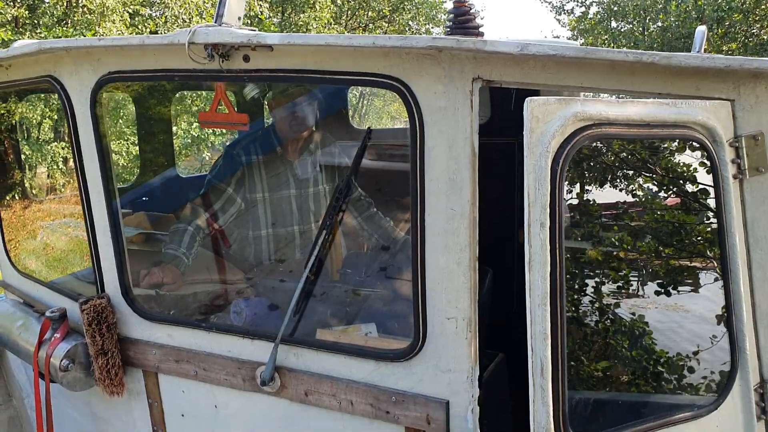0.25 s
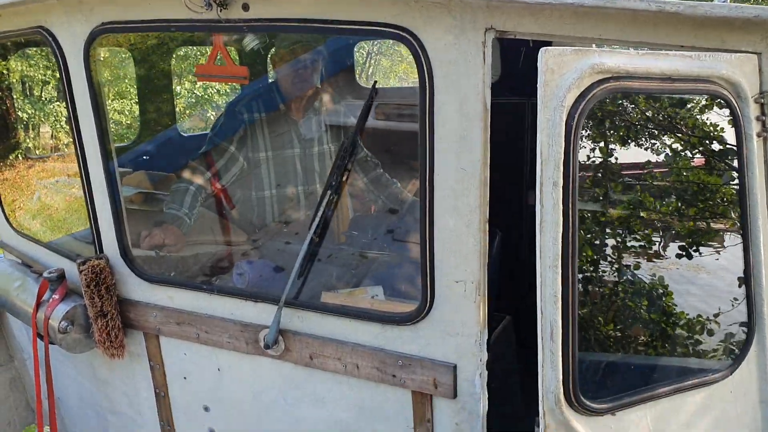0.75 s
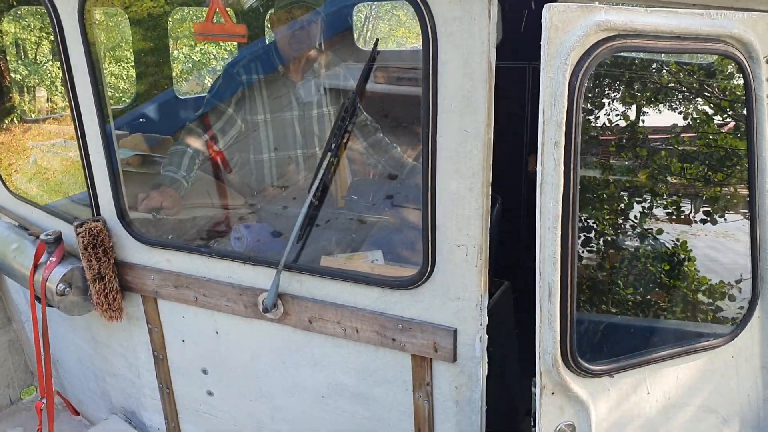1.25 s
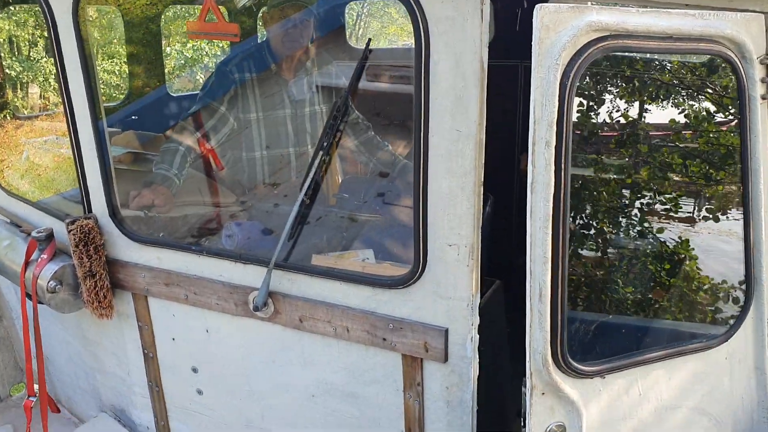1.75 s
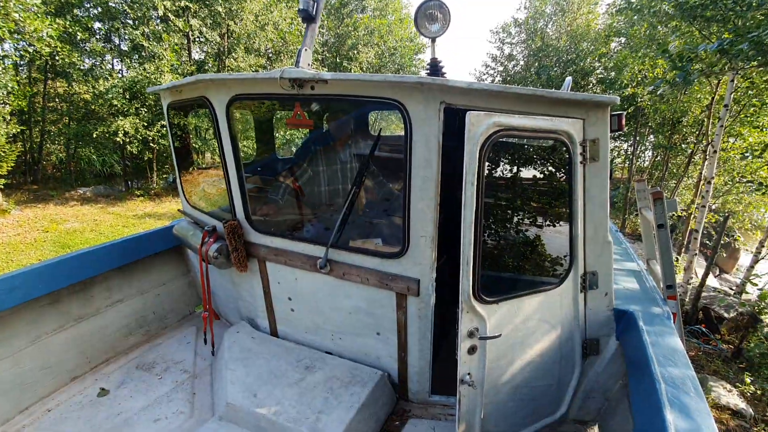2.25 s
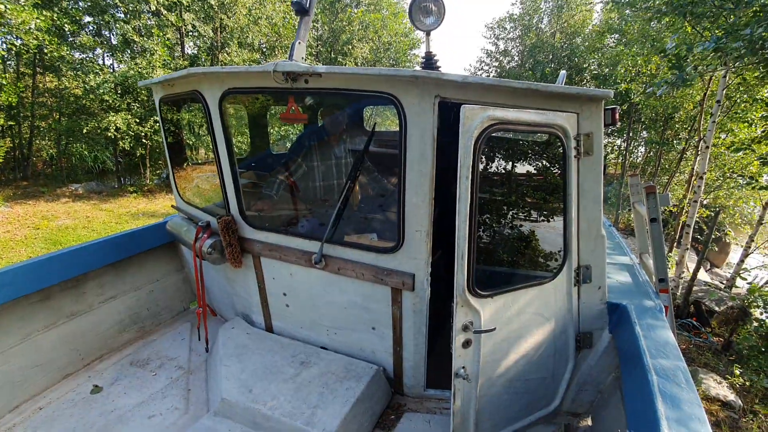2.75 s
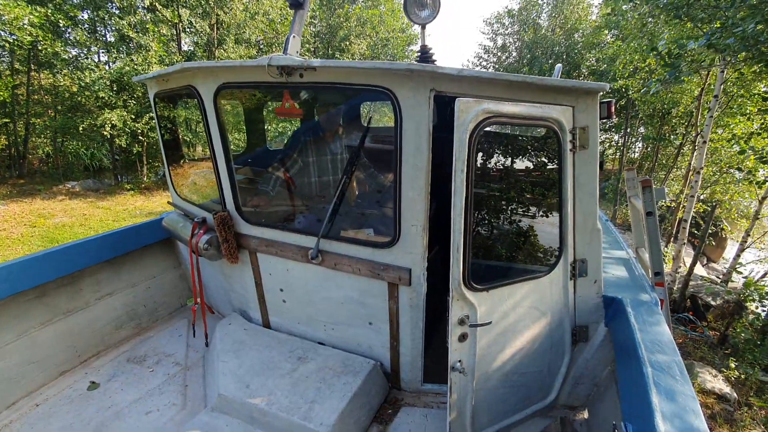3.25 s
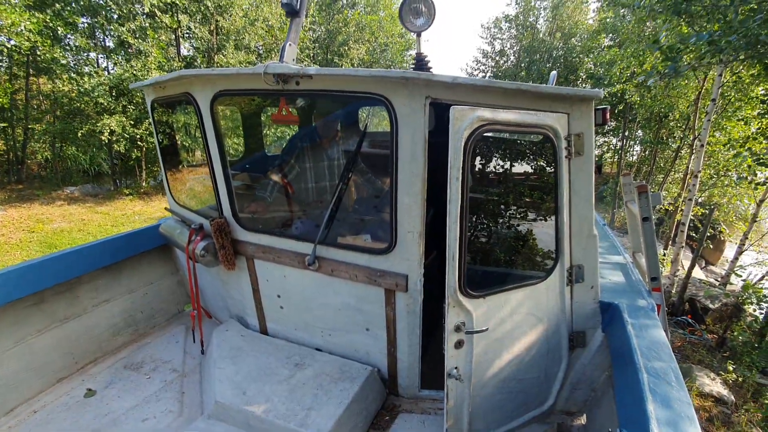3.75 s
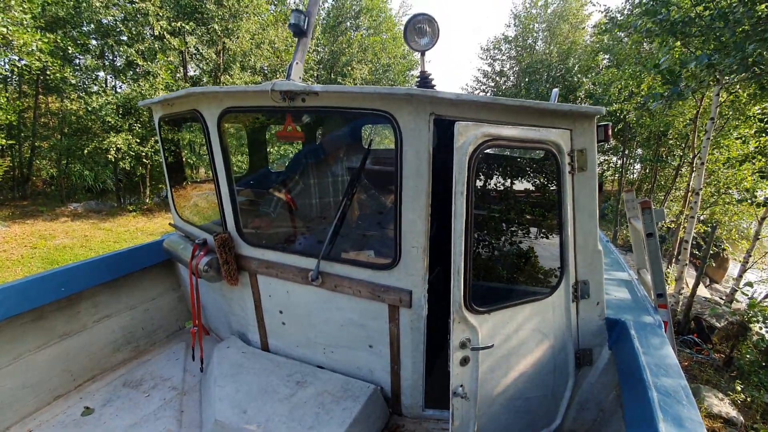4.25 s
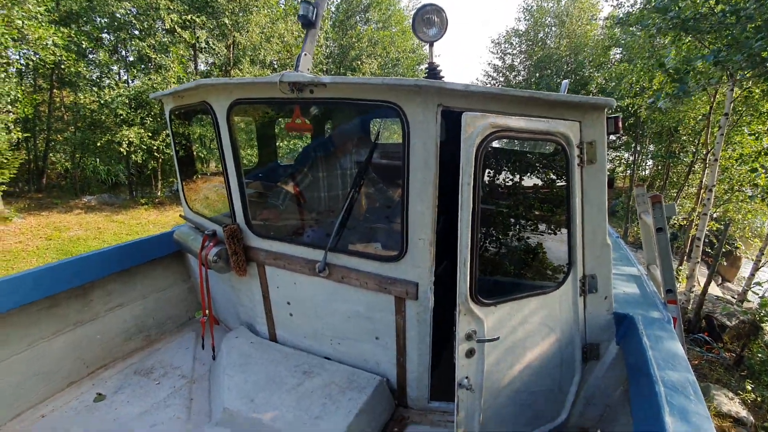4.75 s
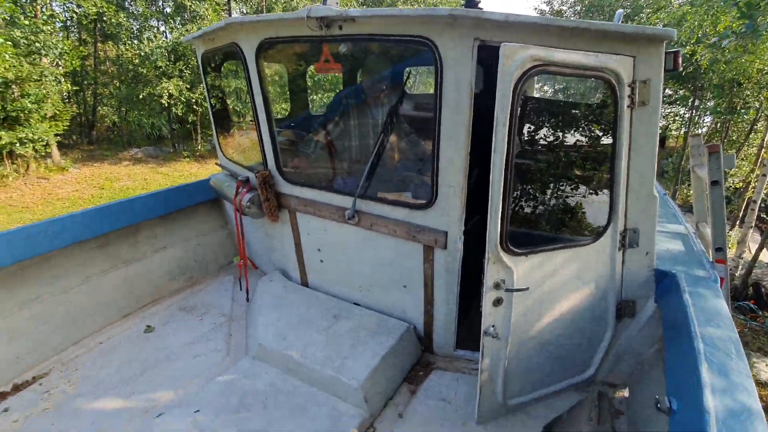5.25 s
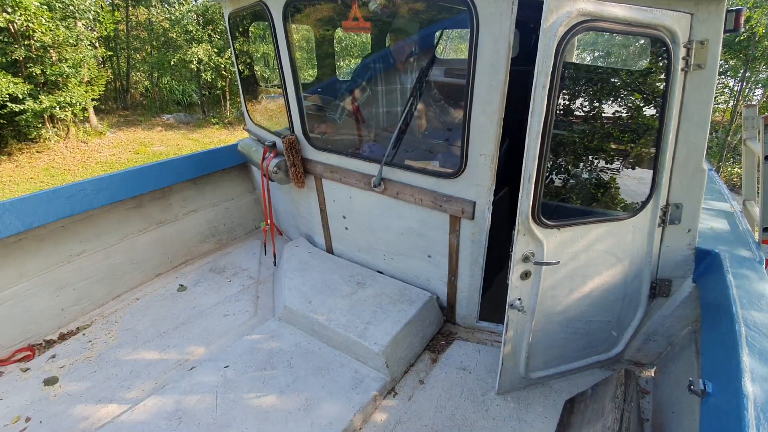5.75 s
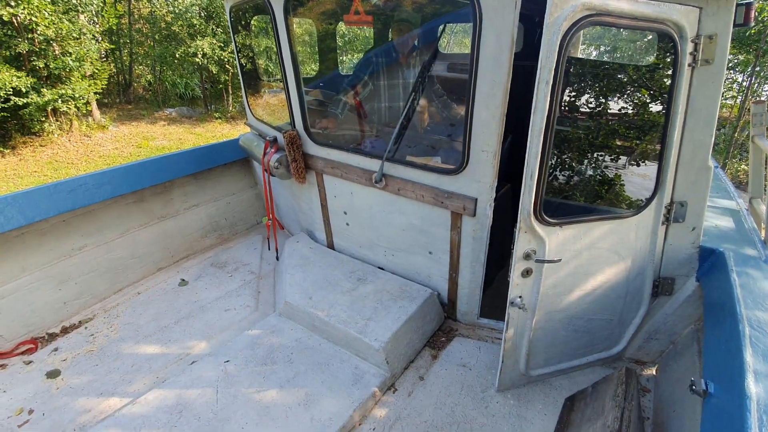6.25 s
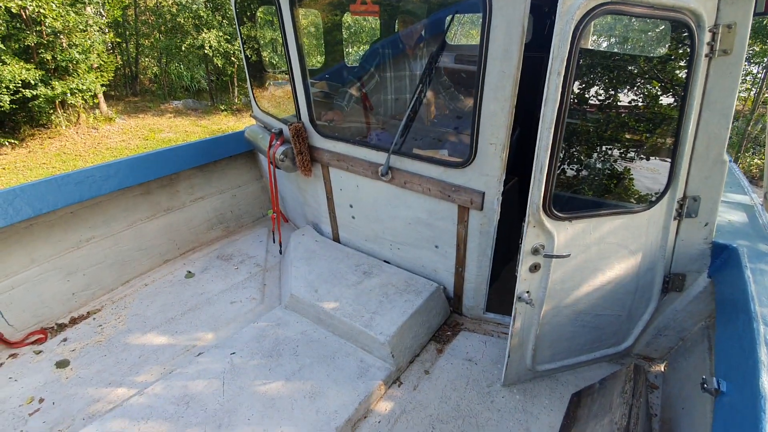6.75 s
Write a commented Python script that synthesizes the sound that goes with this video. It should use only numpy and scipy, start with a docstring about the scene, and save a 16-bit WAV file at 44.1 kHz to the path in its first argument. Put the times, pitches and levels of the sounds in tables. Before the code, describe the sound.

Close by, a boat's idling diesel rumbles and gurgles, surging regularly with a raspy spit, a low thump and a splash.

```python
"""A boat's exhaust burbles and surges about twice a second: a rasping spit, a thump, a splash.
It belongs to a six-cylinder diesel idling in a small boat on land, heard from the deck by the cabin.
The engine's speed sags and recovers with each surge; trapped air hoots in the water-filled muffler.
The engine clatters faintly behind the cabin wall, and a thin whine joins near the end."""
import sys
import numpy as np
from scipy import signal
from scipy.fft import rfft, irfft, next_fast_len
from scipy.io import wavfile
from scipy.ndimage import uniform_filter1d, map_coordinates

SR = 44100
rng = np.random.default_rng(int(sys.argv[2]) if len(sys.argv) > 2 else 0)


def wav_record(signal):
    """Record a signal, one row per channel, as 16-bit PCM in the file named by sys.argv[1]."""
    frames = np.transpose(np.atleast_2d(signal))
    bounded = np.clip(frames, -1, 1)
    # unit amplitude maps onto the largest positive 16-bit level
    quanta = np.round(bounded * 32767).astype(np.int16)
    wavfile.write(sys.argv[1], SR, quanta)


N = 307818
TIME = np.arange(N) / SR

# brief rises and dips of the bass at the start: t/s, level/dB
BASS_LEVEL = [(0, 5), (.11, -1), (.172, 2), (.182, -10), (.22, -2), (.275, 0), (.3, 2.5), (.38, 1.5),
              (.46, 2.5)]
def exhaust(firings, cycles):
    """Gas breaks through the cooling water in uneven gulps, sounding the pipe, muffler and outlet."""
    gulps = blows(firings, count=3, scatter_s=0.04, size_db=0.5)
    bass_gain = amp(curves(BASS_LEVEL)[0]) * lull(depth_db=2, lag_s=0.015, span_s=0.025)
    bass = bass_gain * (thumps(gulps) + drone(cycles)) + thuds(cycles)
    muffler = np.sqrt(np.minimum(bass_gain, 1)) * gurgle(gulps, firings) + hoots()
    return bass + muffler + dip_before_bark(depth_db=3, span_s=0.019) * spit(gulps, firings)


# each surge: t/s, length/ratio, then the boost/dB of thump, churn, spit and spray
SURGES = [(0.357, 1.26, 4.5, 3.5, 8.5, 3), (1.034, 1.3, 1.5, 5.5, 9, 6), (1.514, 1.75, 1.5, 1.7, 5.5, 1.5),
          (1.996, 1.32, 3.5, 3.5, 6, 2.4), (2.465, 1.26, 1, 4.5, 8.5, 4), (2.935, 0.78, 1, 4, 6, 3),
          (3.397, 1.44, 5, 4, 7, 4), (3.892, 1.34, 3, 2, 3.5, 1), (4.342, 1.02, 2, 3, 8, 5),
          (4.815, 1.23, 3, 4.5, 7.5, 3.5), (5.271, 1.1, 4.5, 5.6, 8.3, 4.5), (5.784, 1.7, 2.5, 3.5, 6, 1.4),
          (6.224, 1.3, 1, 5, 10, 3.5), (6.718, 1.27, 2.5, 3.5, 7.3, 3.5)]
# gas flow through the outlet, weaker at first: t/s, level/dB
GAS_FLOW = [(0, -3), (.165, -7), (.19, -8.5), (.245, -9.5), (.31, -7), (.65, -1.5), (1, 0), (2, 1), (7, 0)]
def surge(part, idle_db, lag_s, rise_s, fall_s, steep, dip_db, after_db, drift_db_per_s, flow_share):
    """One part's level in dB: it dips before each surge, swells, then shifts briefly after it."""
    dip_lead_s, dip_s = 0.13, 0.068
    after_lag_s, after_s = 0.22, 0.084
    t = np.linspace(0, N / SR, 2000)
    db = idle_db + drift_db_per_s * t + flow_share * np.interp(t, *np.transpose(GAS_FLOW))
    for s, length, *boosts in SURGES:
        boost_db = boosts[("thump", "churn", "spit", "spray").index(part)]
        db += boost_db * swell(t - s - lag_s, rise_s * length, fall_s * length, steep)
        db -= dip_db * swell(t - s + dip_lead_s, dip_s, dip_s)
        db += after_db * swell(t - s - after_lag_s, after_s, after_s)
    return np.interp(TIME, t, db)


# tone colours of the weak and the strong gas jet: f/Hz, level/dB
SPLUTTER_COLOUR = [(300, -31.5), (520, 3.5), (640, 1.5), (780, 3), (930, 4.5), (1000, 3.5), (1040, -7.5),
                   (1087, 2.5), (1130, -6), (1290, -4.5), (1400, -5.5), (1540, -12.5), (2300, -18),
                   (9000, -101)]
RASP_COLOUR = [(700, -25), (950, 3.5), (1100, 2), (1290, -1), (1400, -12), (1560, -14.5), (2300, -27),
               (4500, -46), (9000, -99)]
def spit(gulps, firings):
    """A weak jet of gas only splutters; a strong one turns raspy and beats with the firings."""
    jet_db = surge("spit", idle_db=-40, lag_s=0.019, rise_s=0.098, fall_s=0.052, steep=3.4,
                   dip_db=1.5, after_db=3, drift_db_per_s=-0.3143, flow_share=0.58)
    weak_jet = patchy(puffs(gulps, life_s=0.012, steady=1), depth_db=2)
    splutter = even(heard(weak_jet, colour(SPLUTTER_COLOUR)), span_s=0.056)
    beats = blows(firings, count=2, scatter_s=0.012, size_db=2.5)
    strong_jet = patchy(puffs(beats, life_s=0.0065, steady=1), depth_db=3)
    rasp = even(heard(strong_jet, colour(RASP_COLOUR)), span_s=0.075)
    rasp_share = np.clip(amp(0.77 * (jet_db - jet_db.max()) - 2.5), 0, 1)
    jet = np.sqrt(1 - rasp_share ** 2) * splutter + rasp_share * rasp
    return amp(jet_db - 2.46 * rasp_share + 0.91 * wobble(16)) * jet


# low ringing notes of the exhaust pipe and hull: f/Hz, width/Hz, level/dB
PIPE_NOTES = [(56.5, 15, -0.5), (79.2, 12, -1.5), (103.3, 21.4, -2.5)]
def thumps(gulps):
    """Gulps of gas make the whole exhaust pipe ring."""
    push_db = surge("thump", idle_db=-27.5, lag_s=0.056, rise_s=0.054, fall_s=0.06, steep=2.1,
                    dip_db=1, after_db=-0.5, drift_db_per_s=0.45, flow_share=0.82)
    ring = heard(bursts(gulps), body(PIPE_NOTES, low_hz=39.5, high_hz=128))
    return amp(push_db + 0.87 * wobble(17)) * even(ring, span_s=0.048)


# the thud ending each surge: t/s, half length/s, then level/dB at 2, 3, 4 and 6 times the firing rate
DEEP_THUDS = [(0.405, .06, -29, -24, -42, -32), (1.106, 0.025, -15, -17.5, -26, -22),
              (1.607, .07, -20.5, -27, -32, -49), (2.054, 0.092, -25, -28.5, -30, -28.5),
              (2.529, .035, -23, -17, -32, -33), (3.004, 0.045, -19, -23, -22.5, -34),
              (3.462, 0.045, -21, -22, -26, -26), (3.98, 0.11, -21.5, -23.5, -33, -32.5),
              (4.416, 0.049, -19, -23.5, -25.5, -25.5), (4.884, 0.092, -24, -31, -25, -27),
              (5.342, .032, -25, -17.5, -17, -24), (5.865, 0.092, -24, -18.5, -30, -35),
              (6.305, 0.056, -16.5, -19.5, -27, -28.5), (6.809, 0.11, -20.5, -27, -26, -41)]
def thuds(cycles):
    """A few heavy firings pass through the pipe; their low notes swell quickly and die away."""
    phase = 2 * np.pi * cycles + 0.099 * wobble(18)
    notes = np.sqrt(2) * np.cos(np.outer((2, 3, 4, 6), phase) + 2 * np.pi * rng.random((4, 1)))
    return sum(swell(TIME - s, 0.87 * length, length, steep=3) * (amp(levels_db) @ notes)
               for s, length, *levels_db in DEEP_THUDS)


def lull(depth_db, lag_s, span_s):
    """The burble's volume sinks briefly after each thud."""
    dips = sum(swell(TIME - s - length - lag_s, span_s, span_s) for s, length, *_ in DEEP_THUDS)
    return amp(-depth_db * dips)


# ringing notes of the muffler: f/Hz, width/Hz, level/dB
MUFFLER_NOTES = [(156.8, 18, 1), (175, 19, -3.5), (197, 66, -6), (222.9, 13.4, 3), (258, 22, -2),
                 (273, 11, -6), (310.7, 16.8, -0.5), (354.8, 18.6, -3.5), (396.5, 34, -7.5),
                 (417, 115, -9.5), (564, 88, -24)]
def gurgle(gulps, firings):
    """Gulps and many smaller bubbles make the water-filled muffler ring."""
    churn_db = surge("churn", idle_db=-26.5, lag_s=0.044, rise_s=0.14, fall_s=0.048, steep=2.8,
                     dip_db=2.5, after_db=-0.5, drift_db_per_s=0, flow_share=0.67)
    bubbles = gulps + blows(firings, count=8, scatter_s=0.06, size_db=0.5)
    gain = amp(churn_db + 0.21 * wobble(12))
    ring = heard(bursts(bubbles), body(MUFFLER_NOTES, low_hz=139, high_hz=672))
    return gain * even(ring, span_s=0.055)


# air pockets in the muffler: t/s, half length/s, f/Hz, level/dB
AIR_POCKETS = [(1.828, 0.13, 230.6, -30.5), (2.221, 0.12, 242.8, -28), (2.448, 0.029, 223, -24.5),
               (2.487, .035, 352.7, -25.5), (2.652, 0.091, 258, -32), (2.92, 0.044, 227.3, -22),
               (2.976, 0.047, 315, -28), (3.39, 0.034, 223.6, -23), (3.445, .025, 365, -28.5),
               (3.649, 0.13, 239.5, -27.5), (4.041, 0.091, 246.6, -30), (4.45, 0.04, 277, -24.5),
               (4.604, 0.036, 254, -31.5), (4.84, 0.11, 248, -28), (5.191, 0.04, 222.4, -23),
               (5.479, 0.15, 252, -28.5), (5.96, 0.079, 273, -32.5), (6.15, 0.097, 211, -26),
               (6.582, 0.059, 240.5, -26.5)]
def hoots(sink_hz_per_s=135, roughness=0.22):
    """Trapped air rings; as the water drains, the pocket grows and its hollow note sinks."""
    notes = np.zeros(N)
    for s, length, hz, db in AIR_POCKETS:
        age = TIME - s
        phase = 2 * np.pi * (hz * age - sink_hz_per_s * age ** 2 / 2 + rng.random())
        notes += amp(db) * swell(age, length, length) * np.sqrt(2) * np.sin(phase)
    return notes * unit(1 + roughness * wobble(62))


# the hull's hum between surges: t/s, level/dB
HULL_HUM = [(0, -34), (1, -41), (2, -34), (2.8, -37), (3.7, -36), (4.2, -26.5), (4.7, -34), (5.5, -33.5),
            (6.5, -30), (7, -28)]
def drone(cycles):
    """The hull hums at two and three times the firing rate, where its lowest notes lie."""
    phase = 2 * np.pi * cycles + 0.3 * wobble(6.3)
    hum = unit(np.sin(2 * phase) + amp(-2.5) * np.sin(3 * phase))
    return amp(curves(HULL_HUM)[0] + 1.5 * wobble(9)) * hum


# sharp cracks from the exhaust: t/s, level/dB
CRACK_HITS = [(0.398, -39), (0.936, -36.5), (1.058, -40), (1.49, -47), (2.41, -41), (2.876, -41),
              (3.325, -47.5), (4.288, -41.5), (5.236, -43), (6.14, -47), (6.645, -49)]
# their tone colour: f/Hz, level/dB
CRACK_COLOUR = [(600, -34), (1200, 11), (2500, 5), (3300, -9), (5200, -5), (7200, -24), (8700, -16),
                (10000, -24), (14000, -50)]
def cracks():
    """A short, bright burst of noise cracks out near the start of most surges."""
    return struck(CRACK_HITS, attack_s=0.0032, life_s=0.032) * heard(noise(), colour(CRACK_COLOUR))


# firings that stand out: t/s, relative level/dB
BARK_HITS = [(0.301, -35.5), (0.337, -34), (0.381, -33), (0.939, -32), (0.985, -27), (1.02, -28),
             (1.059, -28.5), (1.479, -37), (2.01, -40), (2.412, -31.5), (2.442, -31), (2.875, -31),
             (2.912, -34), (2.952, -33.5), (3.354, -31.5), (3.389, -28.5), (3.847, -34), (4.292, -30),
             (4.331, -33), (4.761, -36), (5.187, -37), (5.237, -30), (5.271, -33), (6.184, -33),
             (6.22, -42), (6.299, -41), (6.647, -39)]
# their tone colour: f/Hz, level/dB
BARK_COLOUR = [(500, -23), (780, -9.5), (950, 4.5), (1100, -0.5), (1290, -2), (1450, -24), (2400, -19.5),
               (4500, -36.5), (9000, -82)]
def barks():
    """Single firings bark through the pipe."""
    gas = even(heard(noise(), colour(BARK_COLOUR)), span_s=0.004)
    return amp(3.5) * struck(BARK_HITS, attack_s=0.0008, life_s=0.011) * gas


def dip_before_bark(depth_db, span_s):
    """The jet's volume dips for a moment just before each bark."""
    t = TIME[:SR // 20]
    marks = np.zeros(N)
    marks[[int(s * SR) for s, _ in BARK_HITS]] = 1
    dips = signal.fftconvolve(marks, swell(t, span_s, span_s)[::-1])[len(t) - 1:]
    return amp(-depth_db * dips)


# tone colours of flying and landing spray: f/Hz, level/dB
SPRAY_COLOUR = [(700, -48.5), (1400, -2.5), (1700, -2), (2250, 0), (3000, -5.5), (3900, -6.5), (5000, -15),
                (7000, -22.5), (11000, -38), (14000, -81)]
SPLASH_COLOUR = [(4000, -29), (7600, -18.5), (8700, -9), (9700, -8), (10050, -4), (10700, -9), (11500, -9),
                 (12200, -16), (13500, -34), (15500, -50)]
def water(firings):
    """Puffs tear the cooling water into spray, which lands a moment later as a soft fizz."""
    spray_db = surge("spray", idle_db=-46.5, lag_s=-0.0045, rise_s=0.065, fall_s=0.2, steep=1.1,
                     dip_db=1.5, after_db=-0.3, drift_db_per_s=-0.3946, flow_share=0.67)
    splash_db = surge("spray", idle_db=-60, lag_s=0.056, rise_s=0.067, fall_s=0.16, steep=2,
                      dip_db=2.5, after_db=0.5, drift_db_per_s=-0.58, flow_share=0.56)
    jets = puffs(blows(firings, count=2, scatter_s=0.04, size_db=2), life_s=0.021, steady=1.24)
    jets = deck_echoes(patchy(jets, depth_db=3), echo_db=-14)
    spray = even(heard(jets, colour(SPRAY_COLOUR)), span_s=0.066)
    drops = deck_echoes(patchy(noise(), depth_db=3), echo_db=-17)
    fizz = heard(drops, colour(SPLASH_COLOUR))
    return amp(spray_db + 0.33 * wobble(18)) * spray + amp(splash_db) * fizz


# drops that spatter during a surge: t/s, length/s, level/dB
DROP_CLUMPS = [(0.402, 0.16, -48.5), (1.056, 0.041, -46), (3.407, .05, -51), (3.87, 0.07, -47.5),
               (4.8, .05, -54), (5.745, .04, -51)]
# their tone colour: f/Hz, level/dB
DROP_COLOUR = [(900, -30), (2000, 5), (3400, 7), (4500, -6), (6000, -10), (7000, -16), (10000, -29),
               (15000, -45)]
def spatters():
    """A clump of drops bursts out at once and thins away."""
    strength = sum(amp(db) * swell(TIME - s, 0.012, length) for s, length, db in DROP_CLUMPS)
    drops = noise() * amp(2.7 * wobble(300))
    return strength * heard(drops, colour(DROP_COLOUR))


def stirred_air():
    """The outflow of each surge stirs the air, mostly too low to hear."""
    stir_db = surge("spit", idle_db=-51, lag_s=0.03, rise_s=0.11, fall_s=0.08, steep=2.1,
                    dip_db=4, after_db=-3, drift_db_per_s=1.2, flow_share=0.7)
    return amp(stir_db) * heard(noise(), colour([(10, -3), (27, 5), (45, -12), (120, -59), (400, -120)]))


# puffs of hiss: t/s, fade/s, pitch lift/Hz, level/dB
HISS_PUFFS = [(0.44, .14, 950, -63), (1.09, .13, 700, -55.5), (1.66, .12, 400, -64), (2.1, .15, 250, -59),
              (2.53, .09, 700, -59.5), (2.99, .08, 500, -60), (3.47, .13, 900, -61.5),
              (3.91, .14, 650, -62), (4.42, .1, 550, -66), (4.92, .07, 1000, -65), (5.34, .11, 700, -62),
              (5.84, .12, 500, -70), (6.29, .12, 700, -64), (6.77, .11, 550, -63)]
def trailing_hiss(rise_s=0.035, base_hz=10040, width_hz=1200, whistle_db=-3):
    """A thin, high hiss trails each surge; its pitch lifts and falls back over a steady whistle."""
    strength, lift = np.zeros((2, N))
    for s, fall_s, lift_hz, db in HISS_PUFFS:
        shape = swell(TIME - s, rise_s, fall_s)
        strength += amp(db) * shape
        lift += lift_hz * shape
    glide = unit((noise_band(width_hz) * np.exp(2j * np.pi * np.cumsum(base_hz + lift) / SR)).real)
    whistle = unit((noise_band(220) * np.exp(2j * np.pi * base_hz * TIME)).real)
    return strength * (glide + amp(whistle_db) * whistle)


# loose metal fittings: t/s, half length/s, f/Hz, level/dB
LOOSE_FITTINGS = [(0.457, 0.054, 3300, -50), (0.70, 0.014, 2600, -50), (0.858, 0.013, 3560, -51.5),
                  (1.075, .018, 6850, -55), (1.135, 0.055, 3300, -48), (1.393, .012, 3200, -50),
                  (1.538, 0.028, 2900, -49), (2.52, .05, 3140, -55), (3.46, 0.049, 3110, -50),
                  (3.866, 0.027, 3970, -51), (5.347, 0.05, 3310, -51), (5.755, 0.027, 4800, -55)]
def rattles(width_hz=770, chatter_db=8.5):
    """Each shaken fitting buzzes briefly on one metallic note."""
    grain = noise_band(width_hz) * amp(chatter_db * wobble(140))
    notes = sum(amp(db) * swell(TIME - s, length, length) * np.exp(2j * np.pi * hz * TIME)
                for s, length, hz, db in LOOSE_FITTINGS)
    return (grain * notes).real / np.sqrt(np.mean(grain.real ** 2))


# clatter coming through the cabin wall: t/s, relative level/dB
CLATTER_LEVEL = [(0, -58), (.25, -59.5), (.7, -57), (1.1, -54), (2.2, -55), (3.5, -56.5), (5, -59),
                 (5.8, -56.5), (6.5, -58.5), (7, -57.5)]
# its tone colour: f/Hz, level/dB
CLATTER_COLOUR = [(800, 3.5), (2200, 2.5), (4200, 5), (6000, 0.5), (7500, -5.5), (8900, 1.5), (10000, -4),
                  (12500, -5), (14400, -9), (15800, -13)]
# ringing notes of the steel valves and injectors: f/Hz, width/Hz, level/dB
STEEL_NOTES = [(5920, 78, 8.5), (5720, 70, 10), (6800, 90, -9), (8850, 80, -1), (9550, 45, 4),
               (10253, 60, -1)]
def clatter(firings):
    """Fuel injectors and valves tick softly at every firing."""
    strokes = blows(firings, count=2, scatter_s=0.02, size_db=2)
    ticks = patchy(puffs(strokes, life_s=0.011, steady=2.4), depth_db=2.5)
    ticks = deck_echoes(ticks, echo_db=-8.5)
    ring = amp(-10) * heard(ticks, body(STEEL_NOTES, low_hz=4540, high_hz=11000))
    return amp(curves(CLATTER_LEVEL)[0] + 1.5) * (heard(ticks, colour(CLATTER_COLOUR)) + ring)


# a thin whine and a very high whistle: t/s, f/Hz, level/dB
BELT_WHINE = [(0, 1233, -86), (5.2, 1373, -66), (5.8, 1345, -57), (6.15, 1310, -61), (6.35, 1394, -56),
              (7, 1420, -56)]
BELT_WHISTLE = [(0, 10100, -88), (2.5, 10000, -74), (5.6, 10100, -81), (5.75, 9950, -74),
                (5.97, 9945, -72.5), (6.04, 9950, -82), (7, 9800, -77)]
def whines():
    """Parts driven by the engine's belt sing faintly."""
    return tone(BELT_WHINE, waver=0.0054, flutter_db=2) + tone(BELT_WHISTLE, waver=0.00153, flutter_db=5)


# tone colour of the microphone's hiss: f/Hz, level/dB
HISS_COLOUR = [(9000, -30), (11000, -6), (12500, -2), (14400, 0), (15800, -3.5)]
def microphone_hiss():
    """The microphone adds a faint, even hiss at the very top."""
    return amp(-66) * heard(noise(), colour(HISS_COLOUR))


def deck_echoes(pair, echo_db, count=10):
    """The deck, the boat's sides and the cabin wall add quick echoes that ripple the tone colour."""
    delays_s = rng.uniform(0.0022, 0.022, count)
    echoes = sum(np.roll(pair, int(s * SR), -1) * rng.choice([-1, 1]) for s in delays_s)
    return pair + amp(echo_db) * echoes / np.sqrt(count)


# extra left-right difference in the bass: t/s, boost/dB
BASS_WIDTH = [(0, 15.5), (.4, 8.5), (.8, 10), (1.1, 4.5), (1.3, 5.5), (1.6, 3), (2.5, 3), (3.2, 1), (7, 0)]
def widened(pair):
    """Close to the shaking cabin wall, low notes differ more from ear to ear."""
    side = (pair[0] - pair[1]) / 2
    low_side = filtered(side, lambda hz: amp(along([(250, 0.5), (1200, -22), (3000, -80)], hz)))
    return pair + np.outer([1, -1], (amp(curves(BASS_WIDTH)[0]) - 1) * low_side)


# how alike the two ears' sound is: f/Hz, likeness (1 = the same)
EAR_LIKENESS = [(50, 0.99), (125, 0.98), (230, 0.97), (420, 0.92), (520, 0.8), (620, 0.46), (800, 0.69),
                (1050, 0.84), (1450, -0.19), (1750, -0.096), (2500, 0.31), (3600, -0.15), (5500, 0.11),
                (9000, -0.073)]
def heard(pair, response):
    """Filter a direct and a scattered sound, then spread them over left and right at strength 1."""
    def spread(hz):
        angle = np.arccos(np.clip(along(EAR_LIKENESS, hz), -1, 1)) / 2
        return response(hz) * np.array([np.cos(angle), np.sin(angle)])
    mid, side = filtered(pair, spread)
    return unit(np.array([mid + side, mid - side]))


def blows(firings, count, scatter_s, size_db):
    """Each firing breaks into several blows, late by chance and of uneven size."""
    late, size = rng.standard_normal((2, len(firings), count))
    at = (firings[:, None] + np.abs(late) * scatter_s * SR).astype(int) % N
    return np.bincount(at.ravel(), amp(size_db * size).ravel(), N)


def puffs(hits, life_s, steady):
    """Rushing noise that flares at each blow and dies away, over a steady share."""
    flare = unit(signal.lfilter([1], [1, -np.exp(-1 / (life_s * SR))], hits))
    return (flare + steady) * noise()


def bursts(hits):
    """Jolts of pressure arrive directly and also scatter off the hull."""
    scatter = unit(puffs(hits, life_s=0.03, steady=1))
    direct = unit(hits - hits.mean())
    return np.array([unit(direct + amp(-1) * scatter[0]), scatter[1]])


def patchy(pair, depth_db):
    """Make narrow bands of pitch flicker at random, each for a few hundredths of a second."""
    spectrum = signal.stft(pair, nperseg=1024)[2]
    flicker = rng.standard_normal(spectrum.shape[1:])
    for axis in (0, 1, 0, 1):
        flicker = uniform_filter1d(flicker, size=3, axis=axis)
    return signal.istft(spectrum * amp(depth_db * unit(flicker)), nperseg=1024)[1][:, :N]


def tone(rows, waver, flutter_db):
    """A thin note of unsteady pitch and strength."""
    hz, db = curves(rows)
    phase = 2 * np.pi * np.cumsum(hz * (1 + waver * wobble(38))) / SR
    return amp(db + flutter_db * wobble(15)) * unit(np.sin(phase))


def struck(rows, attack_s, life_s):
    """A sudden rise and a quick fade for each (t/s, level/dB) row."""
    t = TIME[:SR // 4]
    hits = np.zeros(N)
    for s, db in rows:
        hits[int(s * SR)] += amp(db)
    return signal.fftconvolve(hits, (1 - np.exp(-t / attack_s)) * np.exp(-t / life_s))[:N]


def swell(age, rise_s, fall_s, steep=2):
    """A rounded bump that reaches 1 at age zero; a steep one rises suddenly to a flat top."""
    return np.exp(-np.where(age < 0, np.abs(age / rise_s) ** steep, (age / fall_s) ** 2))


def noise():
    """Two channels of white noise."""
    return rng.standard_normal((2, N))


def wobble(rate_hz):
    """A smooth random curve through rate_hz points a second."""
    points = rng.standard_normal(int(N * rate_hz / SR) + 4)
    return map_coordinates(points, [TIME * rate_hz])


def noise_band(width_hz):
    """Random wobbles for each ear that blur a pure note into a band of noise."""
    return np.array([wobble(width_hz) + 1j * wobble(width_hz) for ear in range(2)])


def body(notes, low_hz, high_hz):
    """The filter of an object that rings at these notes, falling steeply outside low to high."""
    def response(f):
        power = sum(amp(db) ** 2 * (f * width) ** 2 / ((hz * hz - f * f) ** 2 + (f * width) ** 2)
                    for hz, width, db in notes)
        edges = (1 + (low_hz / (f + 1)) ** 8) * (1 + (f / high_hz) ** 8)
        return causal(np.sqrt(power / edges))
    return response


def colour(points):
    """A filter through (f/Hz, level/dB) points."""
    return lambda hz: causal(amp(along(points, hz)))


def causal(gain):
    """The filter with this gain that rings only after a blow, never before."""
    cepstrum = irfft(np.log(np.maximum(gain, 1e-6)))
    half = len(cepstrum) // 2
    return np.exp(rfft(np.r_[cepstrum[0], 2 * cepstrum[1:half], np.zeros(half)]))


def filtered(x, response):
    """Pass a sound through a filter given as a function of frequency."""
    size = 2 * next_fast_len(N // 2 + SR // 4)
    return irfft(rfft(x, size) * response(np.fft.rfftfreq(size, 1 / SR)), size)[..., :N]


def along(points, hz):
    """Read between (f/Hz, value) points, with octaves evenly spaced."""
    f, values = np.transpose(points)
    return np.interp(np.log(hz + 1), np.log(f), values)


def curves(rows):
    """One value per sample for each column after the time."""
    times, *columns = np.transpose(rows)
    return [np.interp(TIME, times, column) for column in columns]


def even(x, span_s):
    """Hold the strength near 1 over every stretch of span_s."""
    size = max(int(span_s * SR), 8)
    power = uniform_filter1d(uniform_filter1d(np.mean(x ** 2, 0), size), size)
    return x / np.sqrt(np.abs(power) + 1e-20)


def unit(x):
    """Scale to an average strength (rms) of 1."""
    return x / np.sqrt(np.mean(x ** 2) + 1e-20)


def amp(db):
    """Decibels to gain."""
    return 10 ** (np.asarray(db) / 20)


def scene():
    """The firings set the beat; the engine's speed sags and recovers with each surge."""
    firing_hz, sag_share = 27.813, 0.065
    sag = sum(swell(TIME - s, rise_s=0.08, fall_s=0.095) for s, *_ in SURGES)
    cycles = np.cumsum(firing_hz * (1 - sag_share * sag + 0.006 * wobble(3))) / SR
    firings = np.flatnonzero(np.diff(np.floor(cycles)))  # the sample at which each cylinder fires
    hiss = trailing_hiss()
    pipe = widened(exhaust(firings, cycles) + cracks() + barks() + stirred_air())
    splashes = water(firings) + spatters()
    return pipe + splashes + hiss + rattles() + clatter(firings) + whines() + microphone_hiss()


# how much louder the left side is than the right: f/Hz, level/dB
LEFT_BOOST = [(60, -0.45), (250, 0.94), (600, 1.5), (1000, 2.5), (2000, .8), (6000, 1), (7700, 3),
              (10000, .6), (11500, 1), (13500, 8)]
def record(dry):
    """The microphone's two sides differ in tone colour; the highest treble is cut and the ends fade."""
    top_hz, fade_s = 15780, 0.003
    fade = np.clip(np.minimum(TIME, TIME[::-1]) / fade_s, 0, 1)
    return filtered(dry * fade, lambda hz: amp(np.outer([0.5, -0.5], along(LEFT_BOOST, hz))) * (hz < top_hz))


dry = scene()
out = record(dry)
wav_record(out)
```